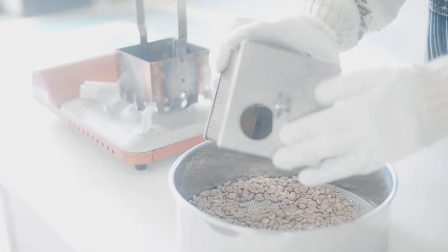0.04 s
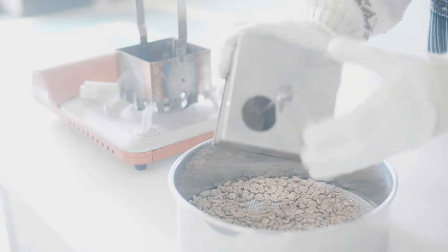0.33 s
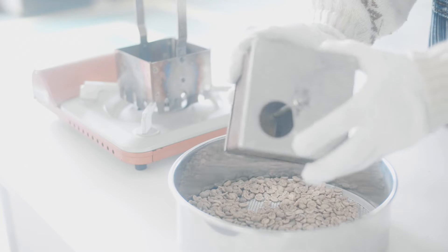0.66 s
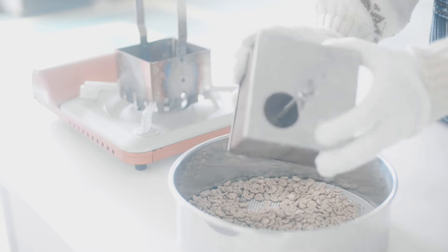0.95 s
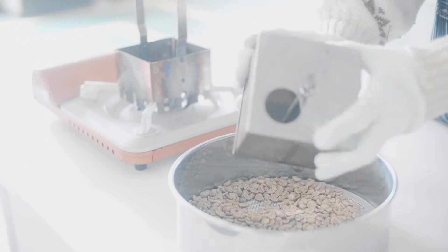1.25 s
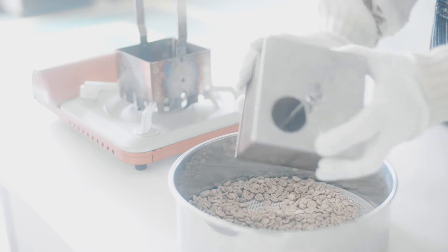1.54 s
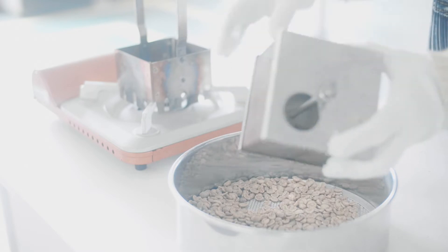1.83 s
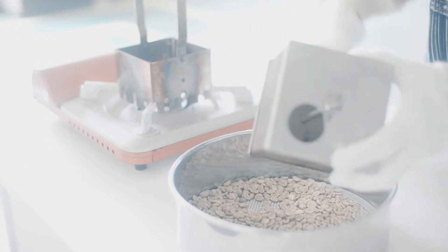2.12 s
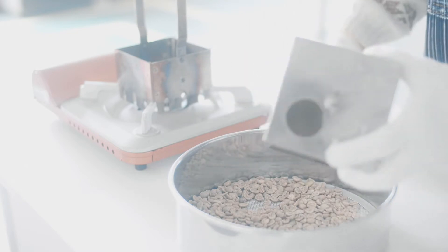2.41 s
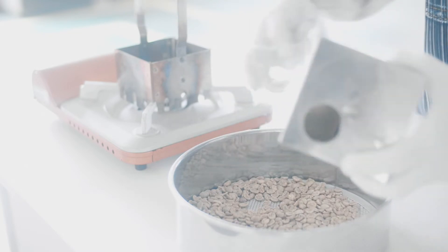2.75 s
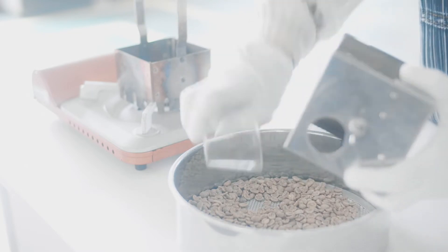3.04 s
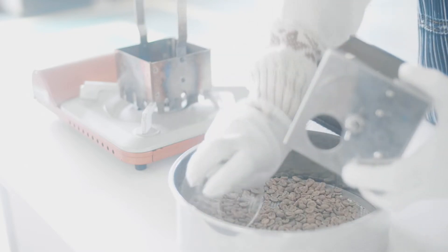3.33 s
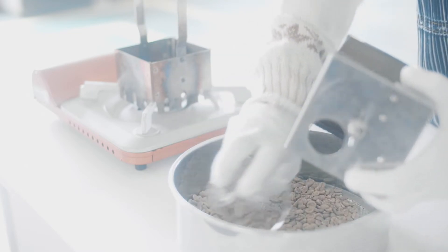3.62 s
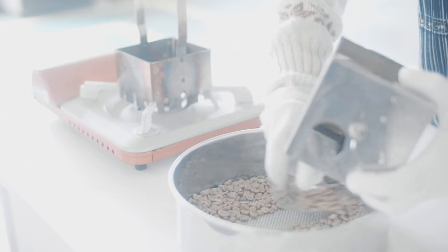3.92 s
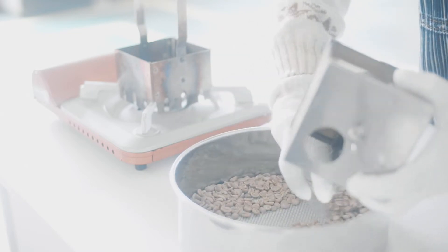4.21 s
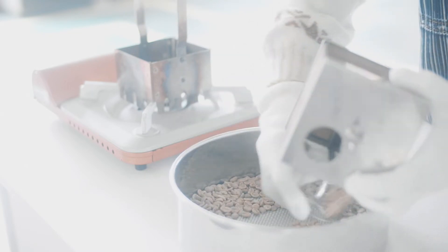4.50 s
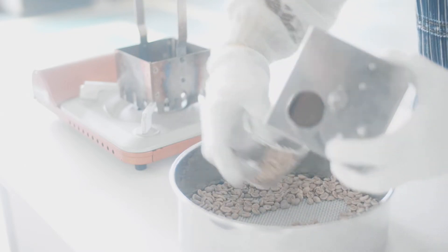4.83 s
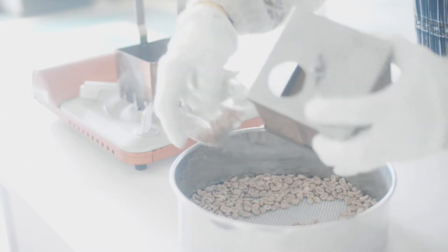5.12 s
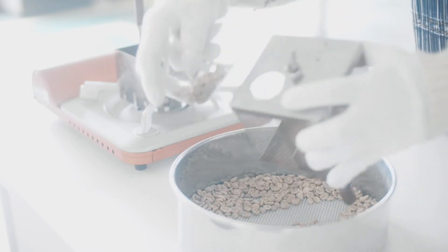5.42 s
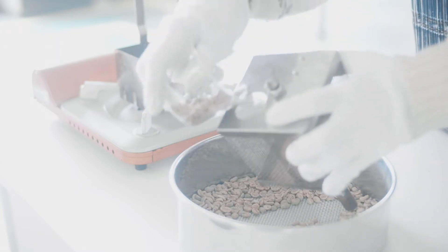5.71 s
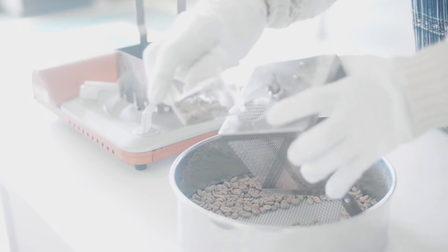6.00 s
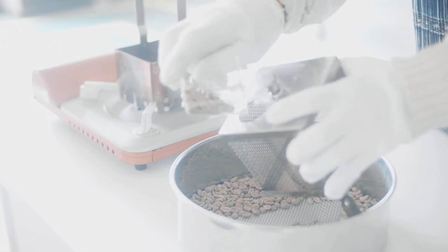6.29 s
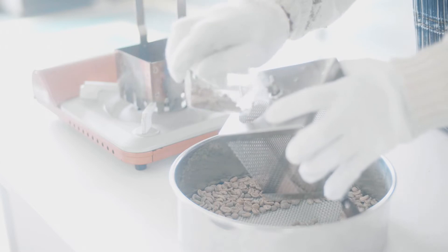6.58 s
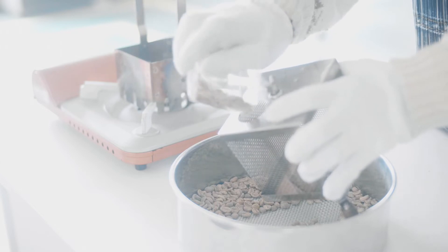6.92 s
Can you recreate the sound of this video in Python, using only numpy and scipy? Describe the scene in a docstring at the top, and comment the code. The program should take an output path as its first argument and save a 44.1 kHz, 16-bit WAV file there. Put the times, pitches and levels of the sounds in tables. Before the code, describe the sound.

In a fairly echoing room with a soft low hum, a small steel box taps faintly in gloved hands and a glass knocks on a table. The glass then scrapes through raw coffee beans in a wire sieve, making the mesh judder, twang and boom. Beans patter and ping into the glass, which strikes the steel with one sharp ringing clack. A lighter clink and a few faint bean ticks follow, all heard from nearby.

```python
"""In a fairly echoing room that hums softly, gloved hands turn a small steel roasting box, take a
glass from the table and scoop raw coffee beans out of a wire sieve. The rim scrapes and judders over
the mesh, which twangs and booms. Beans patter into the glass and make it ring, the glass knocks
against the steel, and the last beans tick as it is tipped."""
import sys
import numpy as np
from scipy import signal
from scipy.fft import rfft, irfft, next_fast_len
from scipy.io import wavfile

SR = 44100
rng = np.random.default_rng(int(sys.argv[2]) if len(sys.argv) > 2 else 0)


def pcm_store(signal):
    """Save signal as 16-bit PCM."""
    levels = np.round(np.clip(np.atleast_2d(signal), -1, 1) * 32767)
    wavfile.write(sys.argv[1], SR, levels.astype(np.int16).T)


N = 306495
TIME = np.arange(N) / SR
BLOW_TIME = TIME[:SR // 5]

# A mode is one tone that an object rings with. Its ring time (t60) is how long it takes to fade 60 dB.
# The glass, damped by the glove. Each row: pitch in Hz, level in dB when knocked, level in dB when
# hit by a bean, ring time in seconds.
GLASS_MODES = [(960, -10.5, -23, .022), (1072, -9.5, -23, 0.029), (1230, -14, -21.5, 0.02),
               (1377, -1.5, -18, 0.078), (1615, -5, -22, .028), (1942, -5, -17.5, 0.029),
               (2170, -14, -19.5, .02), (2480, -7, -19, 0.028), (3012, -11.5, -19.5, .035),
               (3400, 2.5, -5, 0.073), (3460, -1.5, -4.5, .036), (3667, -5, -7, 0.061),
               (4300, -16, -4.5, 0.027), (4480, -3, -5, 0.066), (4700, -14.5, -5.5, .04),
               (5160, -22.5, -0.5, .04), (5570, -7, -10.5, 0.1), (6055, 2, -6.5, 0.033),
               (6140, 7.5, -5.5, .05), (7280, -13.5, -3, 0.064), (7430, -13, -6.5, 0.032),
               (8650, -17, -12.5, .03), (9546, -1, 0, 0.055), (9615, -2.5, -3.5, 0.033),
               (10550, -9, 4.5, 0.067), (11500, -14.5, -2.5, 0.088), (12070, -10.5, -5, 0.07),
               (13960, -12.5, -17, 0.027)]
# The wire sieve. Each row: pitch in Hz, level in dB, ring time in seconds.
SIEVE_MODES = [(153.8, -0.5, .075), (267, -4, 0.031), (336.7, -4, 0.049), (410, -3.5, 0.037),
               (582, -3.5, .014), (790, -7.5, .012), (940, -7.5, .012), (1220, -6.5, .008),
               (1666, -11, 0.0094)]
# The table top. Each row: pitch in Hz, level in dB, ring time in seconds.
TABLE_MODES = [(390, -4, 0.047), (440, 5, 0.018), (551, 0, 0.051), (698, 3, 0.053), (810, 3.5, 0.03),
               (1137, 6.5, 0.0084), (1290, -1.5, 0.054), (1515, 1, 0.023), (1636, -4, 0.05),
               (2370, -12, .025)]
# The tone colour of beans touching. Each row: frequency in Hz, relative level in dB.
BEAN_COLOUR = [(800, -24.5), (2600, -17), (3500, -9), (4300, -5.5), (5200, -3), (6500, -4.5), (7800, -4),
               (8700, -10.5), (11500, -16.5), (13000, -20.5), (15500, -38.5)]
BURIED_SHARE = 0.64   # share of its ring time that the glass keeps among the beans


def scoop():
    """With each push beans slide, the rim rasps on the wires, the sieve rumbles and the glass sings."""
    # Each row: start and length in seconds, then levels in dB for beans, rasp and rumble.
    pushes = [(3.366, 0.056, -49.5, -51.5, -51.5), (3.575, 0.064, -43.5, -52, -46),
              (3.628, 0.18, -32.5, -35, -37.5), (3.803, 0.11, -32, -39.5, -47.5),
              (3.905, 0.19, -30, -40, -41), (4.103, 0.061, -41.5, -50.5, -46.5), (4.2, .05, -47, -57, -56),
              (4.247, 0.076, -39.5, -53.5, -57.5), (4.344, 0.026, -34.5, -55, -55),
              (4.398, 0.13, -41, -56, -61.5), (4.526, 0.063, -36.5, -52.5, -74.5),
              (4.606, 0.032, -46, -57.5, -75), (4.658, 0.098, -64.5, -58, -77)]
    # Tone colours of the rim and the sieve. Each row: frequency in Hz, relative level in dB.
    rasp_colour = [(60, -25.5), (200, -12.5), (500, -11.5), (1200, -5), (1700, -1), (2600, -4), (4000, -7),
                   (6000, -0.5), (9000, -2), (12000, -5.5), (15500, -40.5)]
    rumble_colour = [(60, -38), (100, -25), (140, 7), (175, 6), (210, -4.5), (320, 3.5), (560, -0.5),
                     (850, -5.5), (1150, -6.5), (2000, -20.5)]
    start, length, *levels_db = np.transpose(pushes)
    # A push loses force as it goes on, then the beans come to rest.
    sliding, rasping, rumbling = [
        strokes(np.transpose([start, length, db]), attack_s=0.014, sag_db_per_s=9.5, fade_db_per_s=302)
        for db in levels_db]
    contacts = patter(*sliding, per_s=12000, spread_db=2) + friction(*sliding)
    beans = from_db(-3.5) * coloured(contacts, BEAN_COLOUR)
    creep = creeping_beans()
    rasp = coloured(patter(*rasping, per_s=6500, spread_db=0.7), rasp_colour)
    rumble = coloured(patter(*rumbling, per_s=9900, spread_db=1), rumble_colour)
    hz, knocked_db, bean_db, t60 = np.transpose(GLASS_MODES)
    glass = singing(beans + creep, hz, bean_db + 0.298, t60 * BURIED_SHARE)
    glass += singing(rasp, hz, knocked_db - 0.6, t60 * BURIED_SHARE)
    return from_db(-3.5) * beans + rasp + rumble + glass


def creeping_beans(start_s=6.42, level_db=-70):
    """Beans creep over the wall of the tipped glass at an even pace."""
    # Each row: frequency in Hz, relative level in dB.
    creep_colour = [(1500, -18), (3400, 4), (4400, -14), (6100, -0.5), (7500, -22), (9500, -24),
                    (15000, -26)]
    contacts = patter([start_s, TIME[-1]], [level_db, level_db], per_s=2500, spread_db=8.5, count=2000)
    return coloured(contacts, creep_colour)


def glass_hits(lifted_s=4.8):
    """Steel clacks and rings the glass, longer once it is lifted clear; a bean gives a small ping."""
    # Glass against steel. Each row: time in seconds, clack peak in dB, ring peak in dB,
    # favoured pitch in Hz, its boost in dB.
    steel_knocks = [(3.3579, -63, -49, 3400, 13), (3.362, -44, -41, 10000, 19),
                    (3.3705, -31.5, -27.5, 10200, 16), (3.387, -34.5, -30, 9900, 16),
                    (3.393, -41, -30.5, 10800, 20), (3.4234, -33.5, -37, 10100, 13),
                    (3.625, -46, -24, 11000, 25), (4.3505, -37, -30, 9000, 8),
                    (4.3547, -33, -31, 9500, 8.5), (4.368, -34.5, -38, 3530, 11.5),
                    (4.936, -10.5, -10, 1600, 2.5), (5.7315, -25, -29.5, 9700, 31),
                    (5.840, -55, -54, 9650, 13), (6.8458, -44.5, -48.5, 11500, 27)]
    # Single beans hit the glass. Each row: time in seconds, level in dB, favoured pitch in Hz.
    bean_ticks = [(4.098, -13.5, 5240), (4.324, -20, 7300), (4.4902, -18.5, 4700), (4.5067, -17, 11400),
                  (4.5346, -18.5, 6500), (4.5485, -18.5, 7350), (4.5945, -20, 5360), (4.610, -16.5, 7330),
                  (4.6168, -14, 7350), (4.6385, -26, 7250), (4.6523, -16.5, 7270), (4.6664, -21, 7840),
                  (6.3884, -53.5, 7200), (6.5061, -50, 3490), (6.5994, -57, 3490), (6.6328, -57, 3630),
                  (6.6972, -54.5, 11500), (6.7411, -52.5, 3810), (6.8872, -63, 3520), (6.927, -55, 6080)]
    hz, knocked_db, bean_db, t60 = np.transpose(GLASS_MODES)
    buried_t60 = t60 * BURIED_SHARE
    signs = (-1.) ** (np.arange(len(hz)) // 3)   # some modes swing outwards first, others inwards
    out = np.zeros(N)
    for s, clack_db, ring_db, spot_hz, spot_db in steel_knocks:
        add(out, s, from_db(clack_db) * steel_clack())
        ring_s = t60 if s > lifted_s else buried_t60
        chime = ring(hz, knocked_db, ring_s, spot_hz, spot_db, spot_octaves=0.5, signs=signs)
        add(out, s, from_db(ring_db) * chime)
    for s, level_db, spot_hz in bean_ticks:
        add(out, s, from_db(level_db - 21.5) * clack(BEAN_COLOUR, t60=0.015))
        ping = ring(hz, bean_db, buried_t60, spot_hz, spot_db=17, spot_octaves=0.16, signs=signs)
        add(out, s, from_db(level_db - 7) * ping)
    return out


def steel_clack():
    """Sheet steel held in the hand stops ringing at once."""
    # Each row: frequency in Hz, relative level in dB.
    steel_colour = [(300, -45.5), (550, -12), (850, -1.5), (1400, -9.5), (2000, -2.5), (3000, -5),
                    (3700, -5.5), (5000, -2), (7400, -1), (8600, -14.5), (9800, -1.5), (11200, -11.5),
                    (13000, -15), (15500, -25)]
    return clack(steel_colour, t60=0.02)


def mesh_slips(slacken_s=0.007, swell_s=0.0018):
    """The mesh slips free and slackens, so its twang falls in pitch; the sieve booms under it."""
    # Each row: time in seconds, twang level in dB, its starting pitch in Hz, thud level in dB.
    slips = [(3.372, -46, 593, -41.5), (3.429, -35.5, 610, -39), (3.487, -39.5, 636, -40),
             (3.534, -58, 444, -47), (3.598, -29, 575, -38), (3.636, -29, 700, -34),
             (3.6435, -25.5, 759.2, -35), (3.6505, -30, 710, -35), (3.6765, -24.5, 826, -30),
             (3.6905, -16.5, 885, -29), (3.705, -22, 690, -37), (3.7182, -16.5, 947, -25),
             (3.7324, -17, 807, -31), (3.7465, -24, 765, -48), (3.766, -35, 726, -46),
             (4.002, -24.5, 971, -43), (4.0129, -17.5, 1026, -20), (4.0351, -21.5, 980, -21.5)]
    booms = [(s, thud_db, 288) for s, _, _, thud_db in slips]   # favours the low modes, near 288 Hz
    out = thuds(booms, SIEVE_MODES, spot_db=4, cutoff_hz=2020)
    swell = peak_one(BLOW_TIME * np.exp(-0.5 * (BLOW_TIME / swell_s) ** 2))
    slowing_time = slacken_s * (1 - np.exp(-BLOW_TIME / slacken_s))
    for s, twang_db, hz, _ in slips:
        add(out, s, -from_db(twang_db) * swell * np.sin(2 * np.pi * hz * slowing_time))
    return out


def mesh_drone(waver_hz=2.8):
    """The rubbing rim keeps the lowest mode of the mesh going, with a wavering pitch and weak octave."""
    # The rim bears down. Each row: start in seconds, length in seconds, level in dB.
    presses = [(3.63, 0.079, -49), (3.92, 0.074, -41.5)]
    waver = rms_one(np.interp(TIME, np.linspace(0, TIME[-1], 200), rng.standard_normal(200)))
    phase = 2 * np.pi * np.cumsum(SIEVE_MODES[0][0] + waver_hz * waver) / SR
    level = gain_curve(*strokes(presses, attack_s=0.023, sag_db_per_s=-3, fade_db_per_s=183))
    return level * (np.sin(phase) + from_db(-10.5) * np.sin(2 * phase))


def table_knocks(crack_db=-15):
    """As the glass is picked up it knocks and judders on the table top, which thuds."""
    # Each row: time in seconds, level in dB, favoured pitch in Hz.
    knocks = [(2.2698, -28.5, 780), (2.3615, -26.5, 507), (2.368, -32, 440), (2.3775, -25.5, 800)]
    # The hard edge of a knock. Each row: frequency in Hz, relative level in dB.
    crack_colour = [(300, -25), (600, 1), (1700, 10), (2600, -12), (6500, -18), (9000, -30), (15000, -29)]
    out = thuds(knocks, TABLE_MODES, spot_db=14, cutoff_hz=2400)
    for s, level_db, _ in knocks:
        add(out, s, from_db(level_db + crack_db) * clack(crack_colour, t60=0.038))
    return out


def table_skid(band_hz=(380, 850)):
    """Between knocks the foot of the glass drags, and the table top groans in its low modes."""
    # Each row: start in seconds, length in seconds, level in dB.
    skids = [(2.330, 0.042, -42.5)]
    groan = singing(rng.standard_normal((1, N)), *np.transpose(TABLE_MODES))[0]
    groan = signal.sosfilt(signal.butter(2, band_hz, "band", fs=SR, output="sos"), groan)
    level = gain_curve(*strokes(skids, attack_s=0.0029, sag_db_per_s=-31, fade_db_per_s=454))
    return rms_one(groan) * level


def box_taps():
    """The box shifts in the hands with light taps, brighter when the contact is hard."""
    # Each row: time in seconds, peak in dB, treble tilt in dB per octave.
    taps = [(0.454, -55, 3.5), (0.494, -51.5, -2), (0.657, -55.5, 6.5), (0.8063, -42.5, 5),
            (1.3202, -45, 0.5), (1.437, -60.5, 3.5), (1.498, -54, 6.5), (1.643, -51, 4)]
    # Each row: frequency in Hz, relative level in dB.
    box_colour = [(400, -39), (750, -0.5), (1200, 8), (1800, -5.5), (2600, -15), (3800, -14.5),
                  (4500, -13.5), (5400, -18), (8000, -26.5), (15000, -40)]
    out = np.zeros(N)
    for s, peak_db, tilt_db in taps:
        tilted = [(hz, db + tilt_db * np.log2(hz)) for hz, db in box_colour]
        add(out, s, from_db(peak_db) * clack(tilted, t60=0.05))
    return out


def glove_rubs():
    """A glove hisses softly as it slides over the box or grips the glass."""
    # Each row: start in seconds, length in seconds, level in dB.
    rubs = [(0, 0.23, -76.5), (.56, 0.12, -74), (.7, 0.1, -83), (.94, 0.12, -78), (1.15, 0.068, -73.5),
            (1.52, 0.15, -77.5), (1.64, 0.021, -72), (2.335, 0.018, -71), (2.97, 0.043, -77)]
    # Each row: frequency in Hz, relative level in dB.
    glove_colour = [(1000, -8), (3000, -3.5), (5000, -2.5), (7500, -7), (10000, -4), (15000, -17)]
    rubbing = strokes(rubs, attack_s=0.012, sag_db_per_s=2, fade_db_per_s=135)
    return coloured(friction(*rubbing), glove_colour)


def glove_squeak():
    """The glove squeaks faintly on the lifted glass: a thin tone that rises a little and sinks."""
    # Each row: time in seconds, pitch in Hz, level in dB.
    squeak_path = [(2.44, 4480, -94), (2.47, 4540, -84), (2.52, 4680, -86), (2.59, 4510, -85),
                   (2.66, 4400, -94)]
    s, hz, level_db = np.transpose(squeak_path)
    phase = 2 * np.pi * np.cumsum(np.interp(TIME, s, hz)) / SR
    return gain_curve(s, level_db) * np.sin(phase)


def room_echo(x, build_s=0.00061):
    """Reflections blur into a tail that builds up after the sound and dies soonest in the treble."""
    # Each row: frequency in Hz, ring time in seconds, level in dB, left-right likeness from 0 to 1.
    room_bands = [(115, .7, -9, 0.88), (502, 0.71, -7, 0.48), (1490, 1.15, -5.5, 0.97),
                  (3400, 1.26, -5.5, 0.5), (5530, .95, -9, 0.074), (9000, 0.66, -12.5, .05),
                  (14030, 0.41, -9.5, 0.516)]
    t, hz = TIME[:SR], np.fft.rfftfreq(SR, 1 / SR)
    noise = rfft(stereo_noise(SR, room_bands, column=3))
    tail = 0
    for centre, t60, level_db, _ in room_bands:
        band = at_hz([(row[0], row[0] == centre) for row in room_bands], hz)
        fade = 1000 ** (-t / t60) * (1 - np.exp(-(t / build_s) ** 2))
        tail = tail + from_db(level_db) * irfft(noise * band, SR) * fade / np.linalg.norm(fade)
    return signal.fftconvolve(x, tail, axes=1)[:, :N]


def room_hum(level_db=-62):
    """A soft, steady, low noise fills the room."""
    # Each row: frequency in Hz, relative level in dB.
    hum_colour = [(12, -37.5), (20, -11.5), (86, -10), (113, -3), (172, -5), (216, -7.5), (499, -11.5),
                  (574, -10.5), (976, -18.5), (1190, -20.5), (1570, -24), (2750, -35.5), (3440, -38),
                  (12800, -41), (16000, -59.5)]
    # Each row: frequency in Hz, left-right likeness from 0 to 1.
    hum_likeness = [(30, 0.93), (120, 0.87), (1000, 0.91), (2500, 0.52), (5000, 0.13), (12000, .05)]
    return from_db(level_db) * rms_one(coloured(stereo_noise(N, hum_likeness), hum_colour))


def patter(s, level_db, per_s, spread_db, count=16000):
    """Tiny contacts, each with its own pitch, size and place; they crowd when the motion is strong."""
    when, chance, pitch, big, sign, place, side = rng.random((count, 7)).T
    when = s[0] + when * (s[-1] - s[0])
    level = np.interp(when, s, level_db)
    offered_per_s = count / (s[-1] - s[0])
    share = np.clip(per_s * from_db((level - level.max()) / 2) / offered_per_s, 0, 1)
    size = rms_one(from_db(spread_db * np.minimum(-np.log(1 - big), 4))) * np.sign(sign - 0.5)
    size *= from_db(level) * np.sqrt(SR / (offered_per_s * share))
    heard = chance < share
    steps, out = np.arange(SR // 400), []
    where = ((when[heard] * SR).astype(int)[:, None] + steps).ravel()
    left_lag = 1 + 1.1 * (place[heard, None] - 0.5)   # in samples
    pan_db = 8.5 * (side[heard, None] - 0.5)
    for lag, side_db in ((left_lag, pan_db), (0, -pan_db)):
        age = np.maximum(steps - lag, 0) / SR
        grain = np.sin(np.pi * SR * pitch[heard, None] * age) * np.exp(-age / 0.00082) * from_db(side_db)
        grain *= size[heard, None] / np.sqrt(np.mean(np.sum(grain ** 2, axis=1)))
        out.append(np.bincount(where, grain.ravel(), N)[:N])
    return np.array(out)


def friction(s, level_db, flutter_per_s=150, flutter_db=3):
    """Contacts too small to tell apart make a hiss that flutters as they catch and let go."""
    # Each row: frequency in Hz, left-right likeness from 0 to 1.
    rub_likeness = [(2000, 0.79), (12000, 0.303)]
    left, right = stereo_noise(N, rub_likeness)
    hiss = np.array([np.roll(left, 1), right])   # late on the left, so heard a little to the right
    flutter = np.interp(TIME * flutter_per_s, np.arange(2000), rng.standard_normal(2000))
    return hiss * gain_curve(s, level_db) * from_db(flutter_db * flutter)


def singing(drive, hz, level_db, t60, wander_per_s=45, wander_db=3.5):
    """An object rings along with whatever rubs it; its modes come and go as the contact point moves."""
    out, steps = 0, np.arange(1000)
    for angle, db, decay in zip(2 * np.pi * hz / SR, level_db, 1000 ** (-1 / (t60 * SR))):
        gains = from_db(db + wander_db * rng.standard_normal(len(steps)))
        grip = np.interp(TIME * wander_per_s, steps, gains)
        feedback = [1, -2 * decay * np.cos(angle), decay * decay]
        out = out + signal.lfilter([1 - decay, 0, decay - 1], feedback, drive * grip + 1e-18)
    return out


def ring(hz, level_db, t60, spot_hz, spot_db, spot_octaves, signs=1):
    """A struck object rings; the spot that is hit favours the modes near one pitch."""
    favour_db = spot_db * np.exp(-(np.log2(hz / spot_hz) / spot_octaves) ** 2)
    strength = signs * from_db(level_db + favour_db + rng.normal(0, 1, len(hz)))
    modes = np.sin(2 * np.pi * np.outer(hz, BLOW_TIME)) * 1000 ** -np.outer(1 / t60, BLOW_TIME)
    low_cut = signal.butter(4, hz[0], "high", fs=SR, output="sos")   # little sounds below the lowest mode
    return peak_one(signal.sosfilt(low_cut, strength @ modes))


def thuds(events, modes, spot_db, cutoff_hz):
    """Dull blows on a heavily damped object; the soft contact takes the edge off."""
    out = np.zeros(N)
    for s, level_db, spot_hz in events:
        add(out, s, from_db(level_db) * ring(*np.transpose(modes), spot_hz, spot_db, spot_octaves=0.96))
    return signal.sosfilt(signal.butter(2, cutoff_hz, fs=SR, output="sos"), out + 1e-18)


def clack(colour, t60):
    """Countless modes that die at once sound like a short burst of noise."""
    burst = rng.standard_normal(len(BLOW_TIME)) * 1000 ** (-BLOW_TIME / t60)
    return peak_one(coloured(burst, colour))


def strokes(events, attack_s, sag_db_per_s, fade_db_per_s):
    """Times and dB levels of hand movements: each swells, sags (grows if sag is negative) and fades."""
    start, length, level_db = np.transpose(events)[:, :, None]
    s = TIME[(TIME >= start.min()) & (TIME <= (start + length).max() + 0.2)][::SR // 1000]
    age = np.maximum(s - start, 0)
    fall_db = sag_db_per_s * age + fade_db_per_s * np.maximum(age - length, 0)
    gain = np.minimum(age / attack_s, 1) * from_db(level_db - fall_db)
    return s, 20 * np.log10(gain.max(axis=0) + 1e-7)


def gain_curve(s, level_db):
    """A movement's level as a gain at every sample."""
    return np.interp(TIME, s, from_db(level_db), left=0, right=0)


def coloured(x, colour):
    """Give a sound a tone colour; white noise keeps its power."""
    size = next_fast_len(x.shape[-1] // 2 + SR // 20) * 2
    gain = rms_one(from_db(at_hz(colour, np.fft.rfftfreq(size, 1 / SR))))
    # Fold the filter so that nothing sounds ahead of its cause (minimum phase).
    cepstrum = irfft(np.log(gain))
    cepstrum[1:size // 2] *= 2
    cepstrum[size // 2 + 1:] = 0
    return irfft(rfft(x, size) * np.exp(rfft(cepstrum)), size)[..., :x.shape[-1]]


def stereo_noise(size, likeness, column=1):
    """White noise whose two sides are alike to a degree that depends on frequency."""
    mid, side = rfft(rng.standard_normal((2, size)))
    alike = np.clip(at_hz(likeness, np.fft.rfftfreq(size, 1 / SR), column), 0, 1)
    return rms_one(irfft(np.sqrt(1 + alike) * mid + np.sqrt(1 - alike) * side * [[1], [-1]], size))


def at_hz(points, hz, column=1):
    """Read between the rows of a table, with octaves evenly spaced."""
    points = np.array(points)
    return np.interp(np.log(np.maximum(hz, 1)), np.log(points[:, 0]), points[:, column])


def add(track, s, sound):
    """Mix a sound in at s seconds."""
    start = round(s * SR)
    track[start:start + len(sound)] += sound[:N - start]


def from_db(db):
    return 10 ** (np.asarray(db) / 20)


def rms_one(x):
    return x / np.sqrt(np.mean(x ** 2) + 1e-20)


def peak_one(x):
    return x / np.abs(x).max()


def scene():
    """The work of the hands, with the room's echo and hum around it."""
    table = table_knocks() + table_skid() + glove_squeak()
    handling = glass_hits() + box_taps() + mesh_slips() + mesh_drone() + table
    gloves = glove_rubs()
    direct = np.array([np.roll(handling, 1), handling]) + scoop() + gloves   # a little to the right
    hum = room_hum()
    into_room = direct.mean(axis=0, keepdims=True) + from_db(-8.5) * table   # the table is farther off
    around = room_echo(into_room) + hum
    return direct * from_db([[0.15], [-0.15]]) + around * from_db([[1.1], [-1.1]])


def record(dry):
    """The highest treble, above 15700 Hz, is cut off."""
    return signal.sosfilt(signal.ellip(10, 0.2, 80, 15700, fs=SR, output="sos"), dry)


dry = scene()
out = record(dry)
pcm_store(out)
```